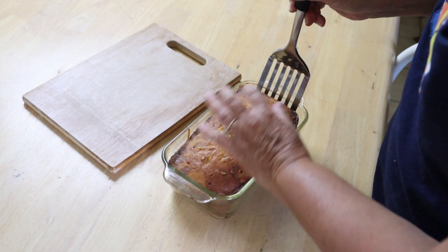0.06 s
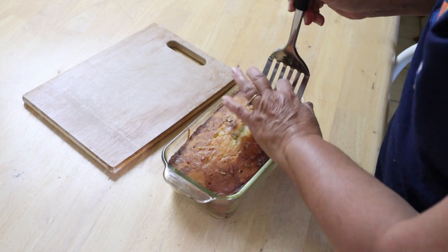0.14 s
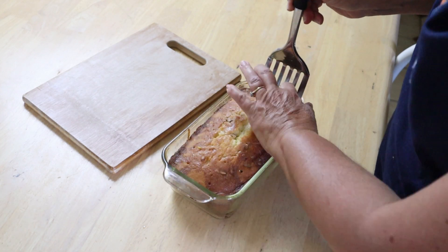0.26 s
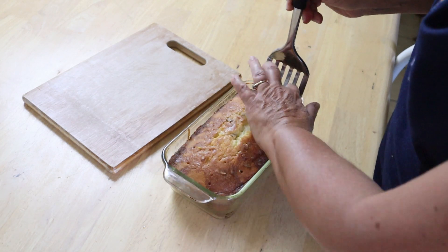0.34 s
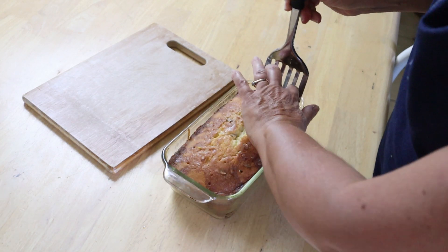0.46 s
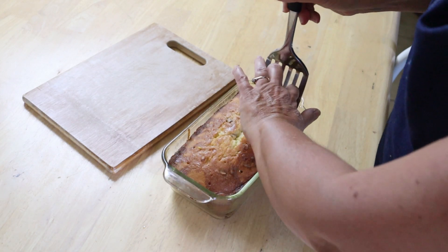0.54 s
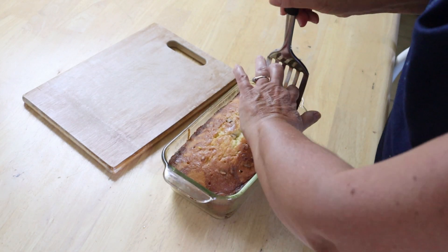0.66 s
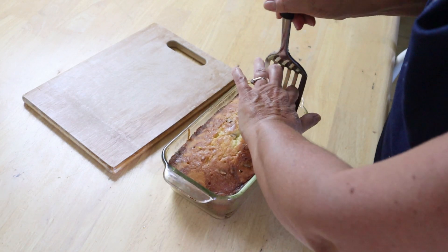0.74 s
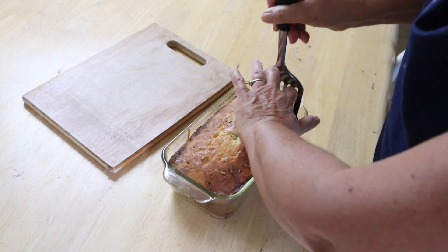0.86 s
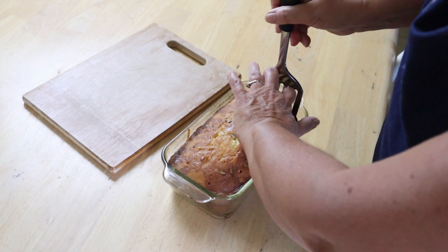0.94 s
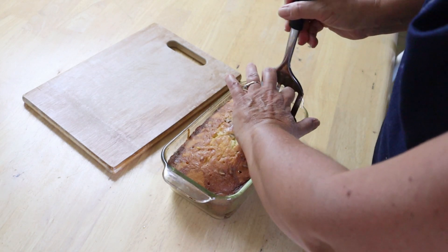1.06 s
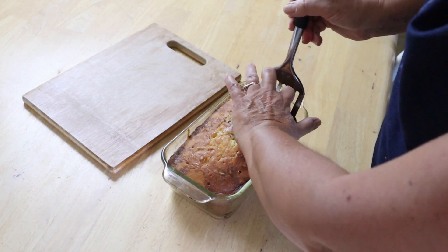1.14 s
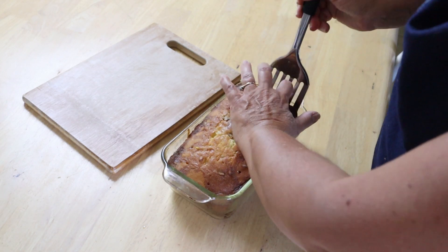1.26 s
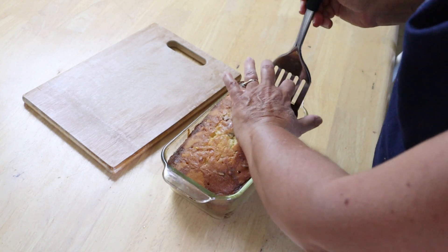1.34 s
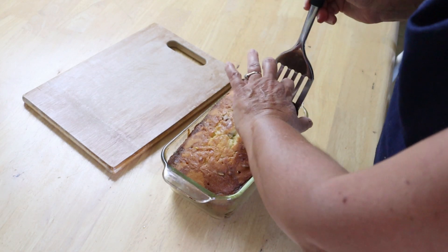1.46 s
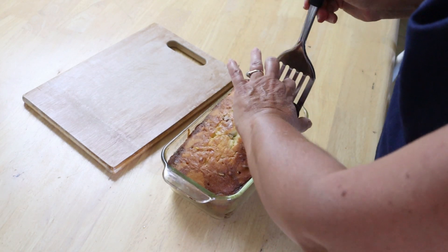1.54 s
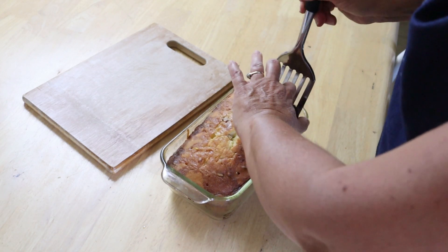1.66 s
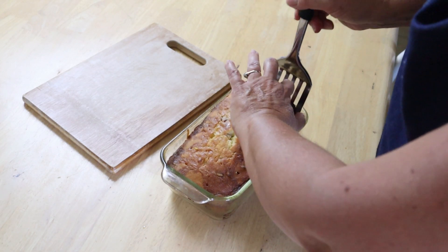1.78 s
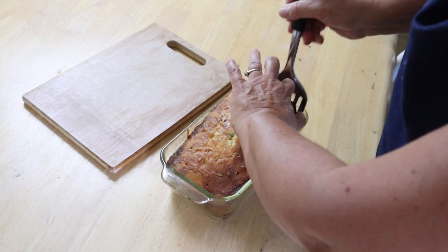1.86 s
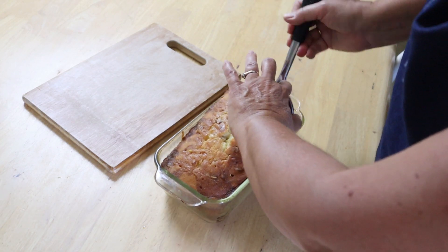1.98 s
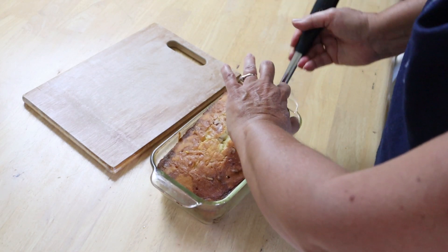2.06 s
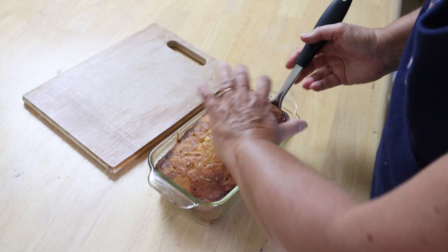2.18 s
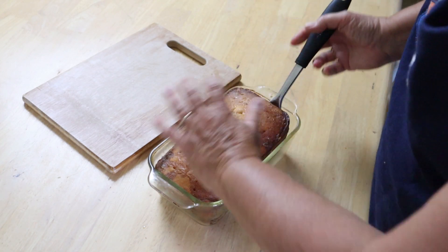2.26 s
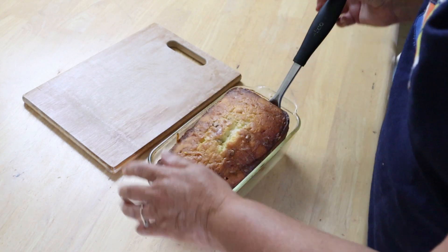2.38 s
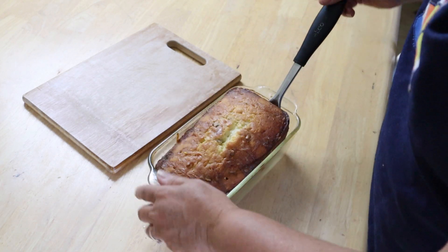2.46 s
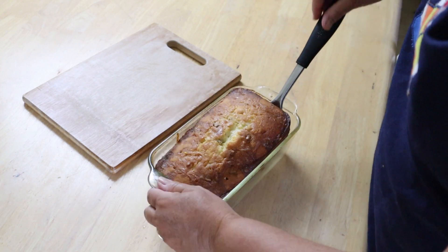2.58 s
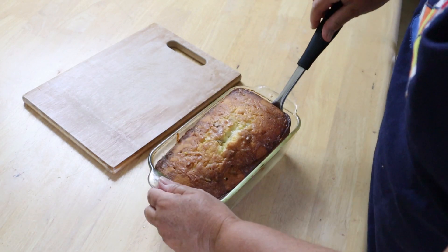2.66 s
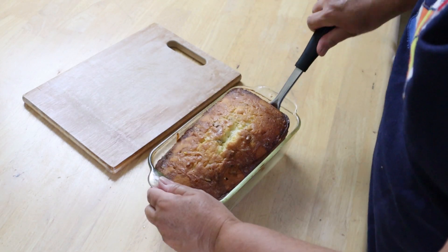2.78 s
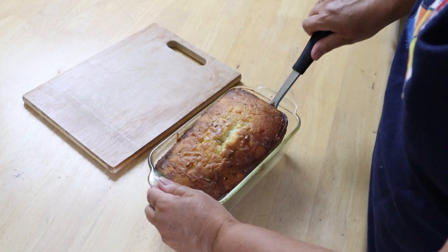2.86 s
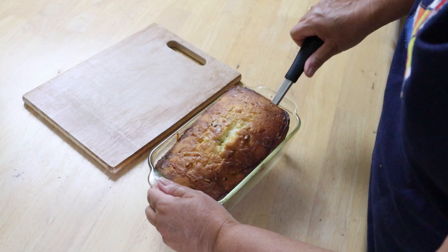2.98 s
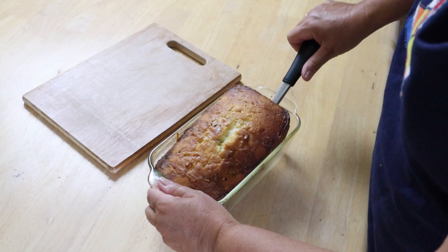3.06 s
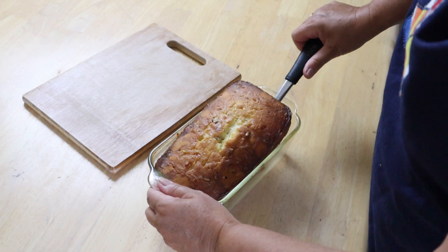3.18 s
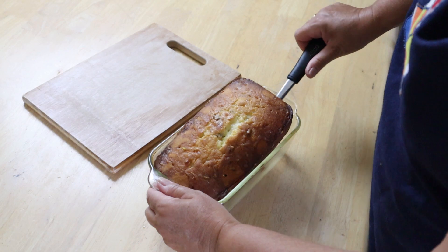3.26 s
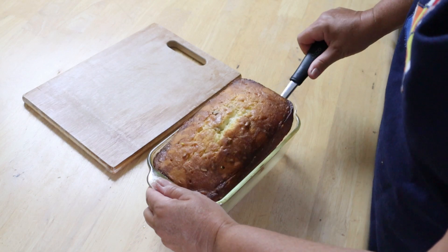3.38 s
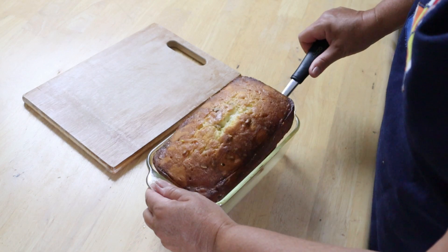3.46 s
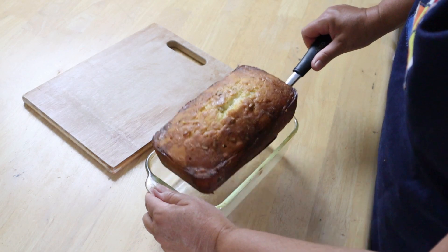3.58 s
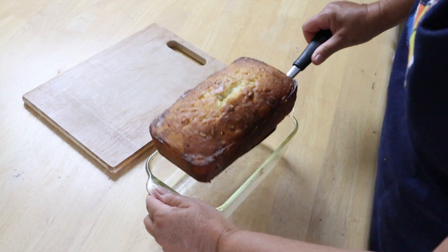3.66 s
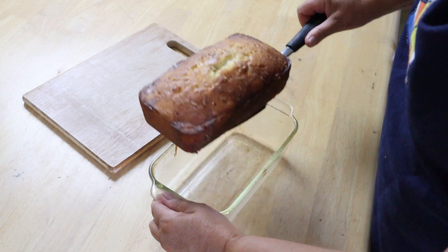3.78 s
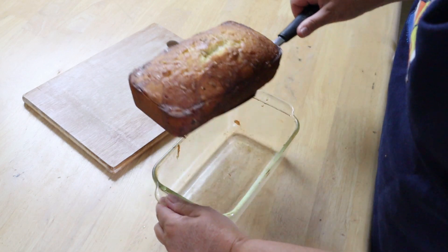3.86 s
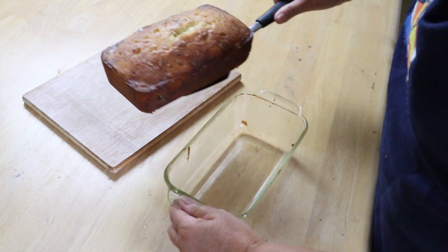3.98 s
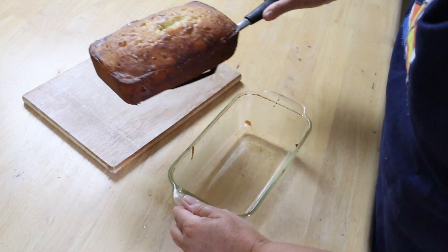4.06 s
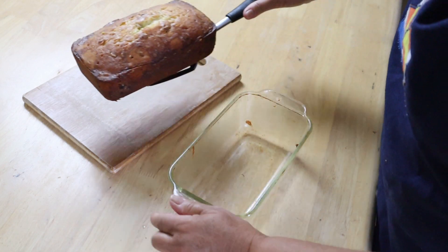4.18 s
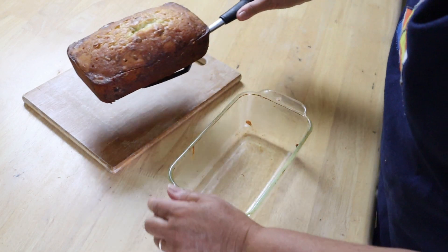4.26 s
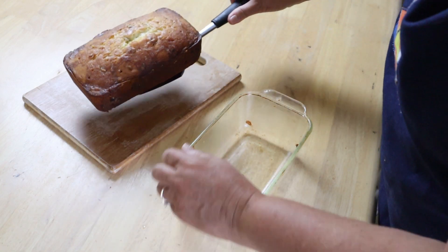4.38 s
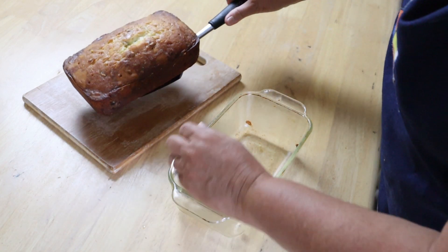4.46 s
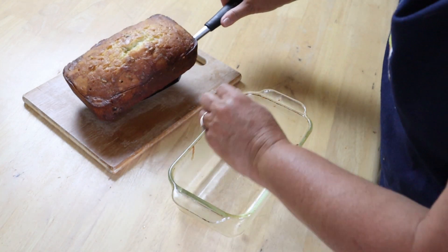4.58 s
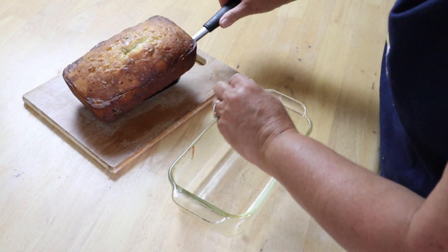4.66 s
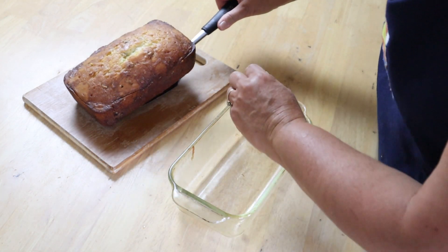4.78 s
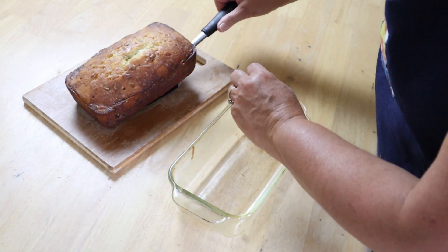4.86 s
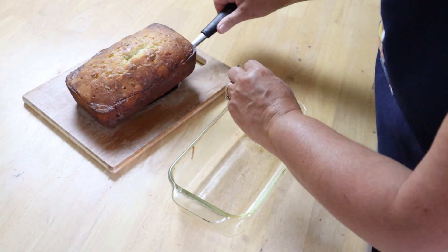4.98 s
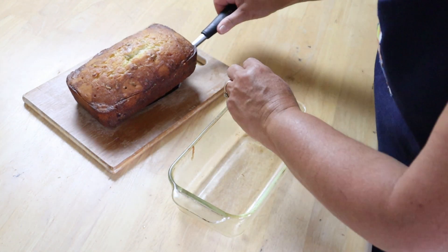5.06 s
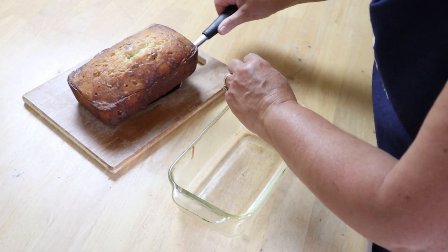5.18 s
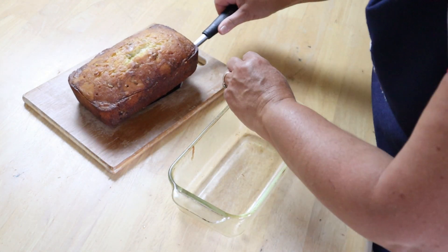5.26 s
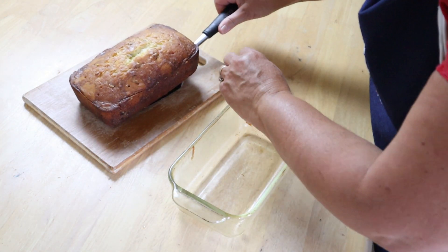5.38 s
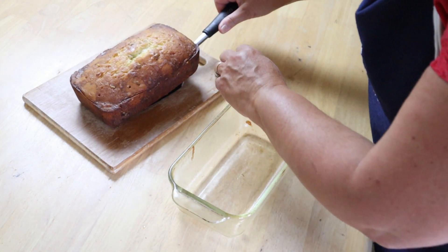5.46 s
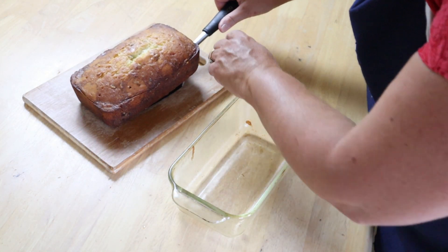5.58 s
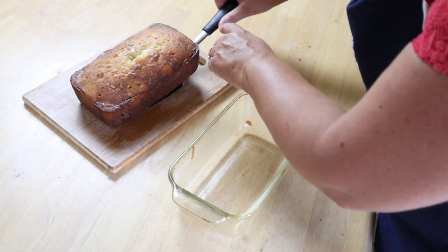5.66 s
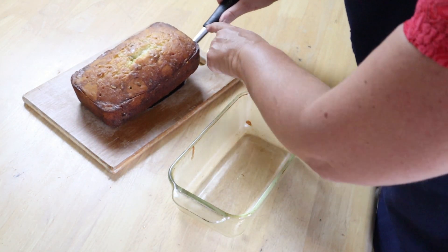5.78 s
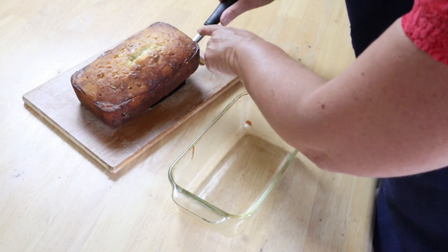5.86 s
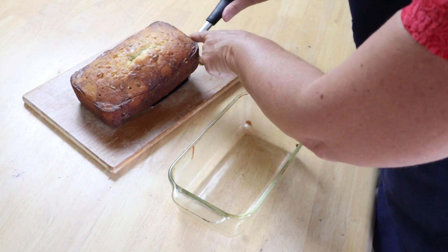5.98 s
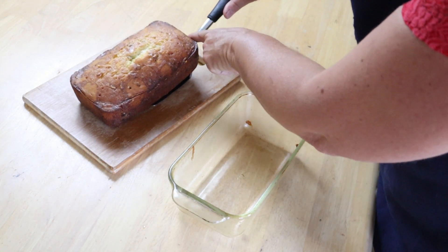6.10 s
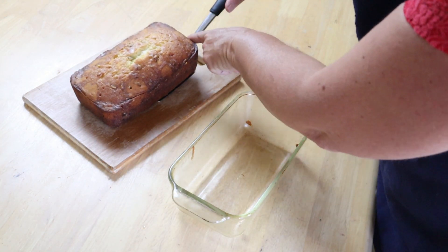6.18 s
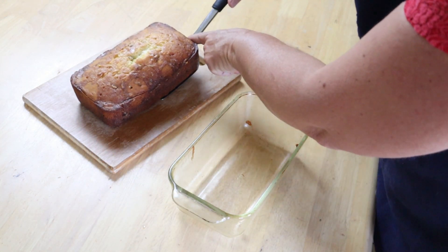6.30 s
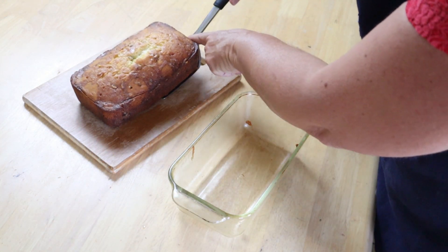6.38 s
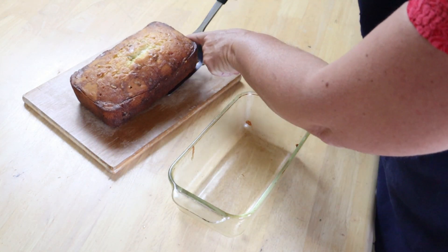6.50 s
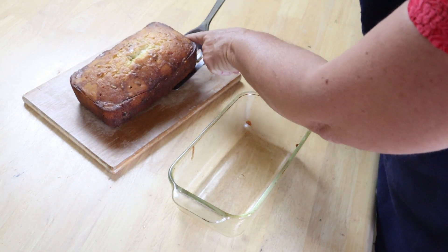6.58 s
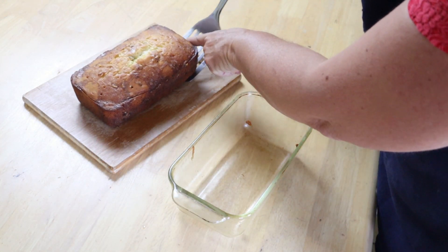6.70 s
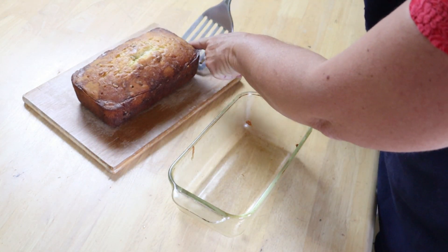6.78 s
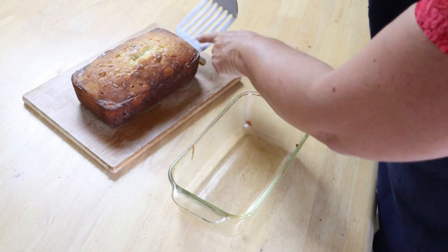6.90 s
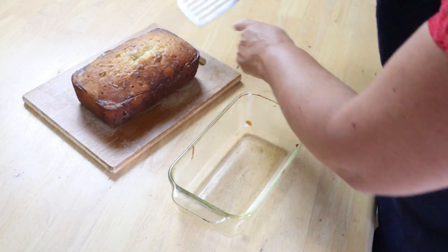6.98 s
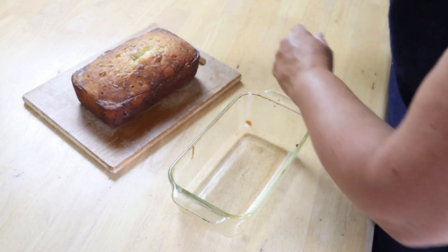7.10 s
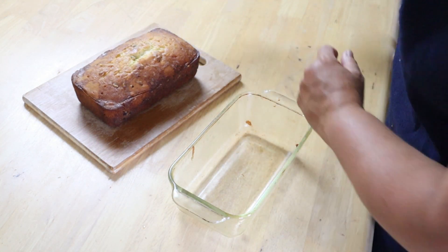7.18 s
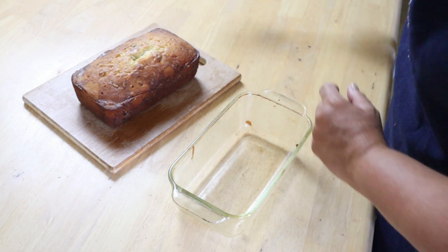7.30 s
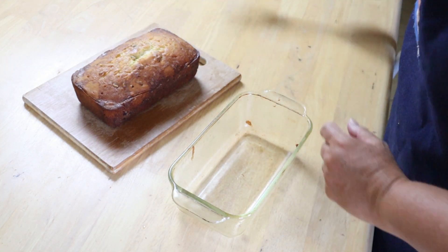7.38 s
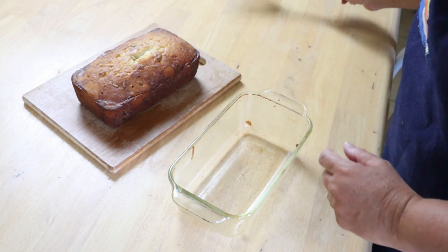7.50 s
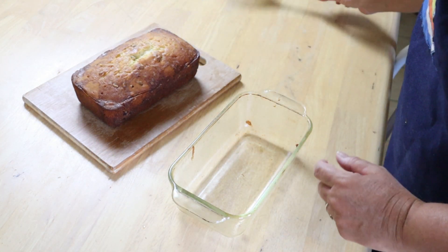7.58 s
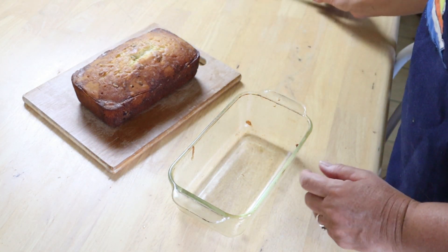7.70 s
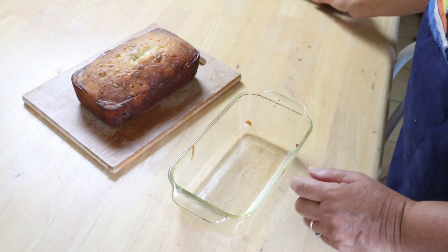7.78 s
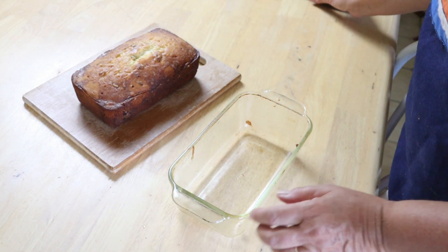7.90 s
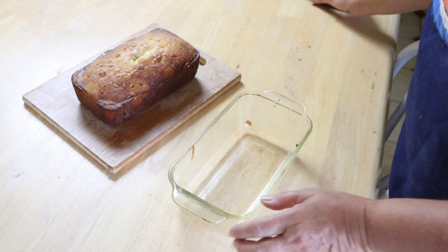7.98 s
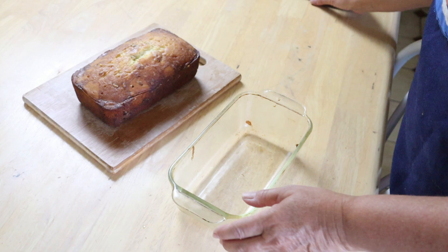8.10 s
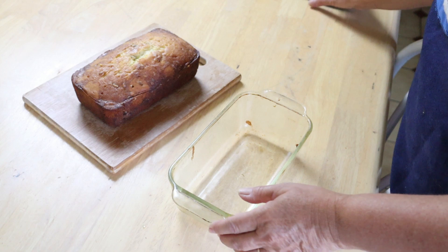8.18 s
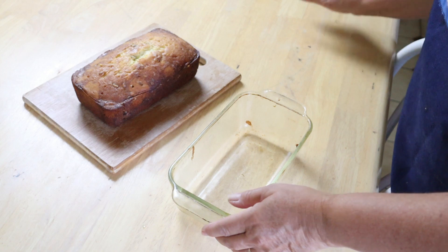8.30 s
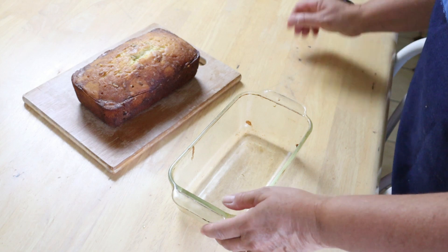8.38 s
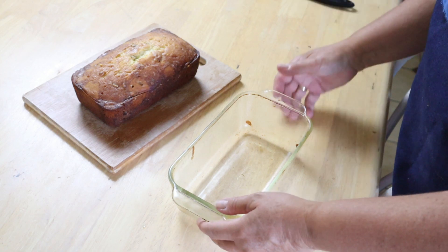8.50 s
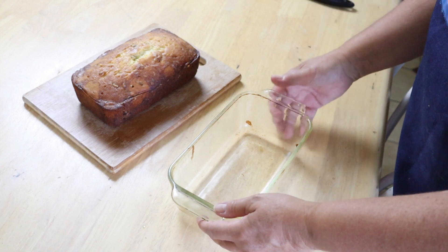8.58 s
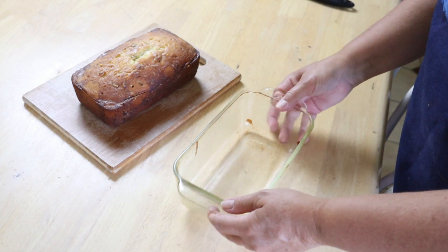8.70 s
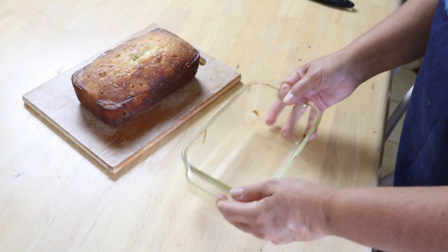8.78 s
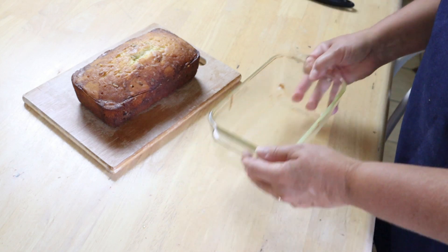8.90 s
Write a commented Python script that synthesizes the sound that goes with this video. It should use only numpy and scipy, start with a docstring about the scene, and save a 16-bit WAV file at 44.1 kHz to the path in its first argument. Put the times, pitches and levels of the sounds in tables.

```python
"""A steel spatula is worked under a loaf in a glass dish: the blade scrapes and clinks, and the dish rocks
and knocks on a wooden table. The loaf is lifted, set down on a board with a thud, and the blade drawn out.
Then the empty dish is bumped on the table and picked up. A clock ticks faintly across the small kitchen.
Hits are fading tones (modes) and short noise bursts; rubbing is a stream of tiny slips that excites modes
or is filtered to a spectrum. All of it gets the kitchen's reverberation, over a quiet background hush."""
import sys
import numpy as np
from scipy import signal
from scipy.fft import rfft, irfft
from scipy.io import wavfile
from scipy.ndimage import map_coordinates

SR = 44100
rng = np.random.default_rng(int(sys.argv[2]) if len(sys.argv) > 2 else 0)


def master_out(mix):
    """Clip the mix to full scale and print it as 16-bit PCM to the path in sys.argv[1]."""
    frames = np.transpose(np.atleast_2d(mix))
    ceiling = np.clip(frames, -1, 1)
    pcm = np.round(ceiling * 32767).astype(np.int16)
    wavfile.write(sys.argv[1], SR, pcm)


N = 394254
TIME = np.arange(N) / SR
AGE = TIME[:SR]  # seconds since a hit; each hit lasts one second
STROKE_RANGE_DB = 20  # level change over a rubbing stroke's rise time, and over its fall time

# Ringing tones of the table top. Each row: pitch in Hz, level in dB, time to fade by 60 dB in seconds.
TABLE_MODES = [(133.3, -30.5, 0.28), (235, -38.5, 0.03), (312, -12, 0.093), (415, -23, 0.039),
               (486, -26, 0.19), (569.5, -12, 0.067), (692, -20, 0.059)]
# Ringing tones of the steel blade. Each row: pitch in Hz, level in dB, basic time to fade by 60 dB in
# seconds (a clink stretches or shortens it and lifts some levels).
BLADE_MODES = [(956, -5.5, 0.06), (1449.5, 2, 0.16), (1798, -3, 0.035), (1872, 3.5, 0.094),
               (2344, 5, 0.094), (2875, -9.5, 0.16), (3355, 2, 0.08), (3730, -11.5, 0.17), (4240, 3, 0.082),
               (4690, -9, 0.11), (4910, -5, 0.068), (5170, -9.5, 0.28), (5340, -8, 0.31), (5440, -11, 0.22),
               (5970, -10, 0.19), (6470, -8, 0.16), (6640, -6, 0.16), (6965, -9.5, 0.14), (7800, -9, 0.21),
               (7900, -7.5, 0.15), (8900, -13, 0.18), (9500, -16, 0.23), (10190, -17, 0.2),
               (11400, -18, 0.32), (13360, -13.5, 0.13)]
# Noise colour of steel on glass. Each row: frequency in Hz, relative level in dB.
STEEL_SPECTRUM = [(300, -16), (900, -3), (1600, 5), (2800, -2), (4300, 0), (8000, 0.5), (11000, -11.5),
                  (15500, -12.5)]
# Noise colour of the groaning table and dish. Each row: frequency in Hz, relative level in dB.
GROAN_SPECTRUM = [(25, -42), (70, -23), (125, 2.5), (200, -20.5), (380, 5), (550, -9), (750, -3.5),
                  (1000, -8), (1600, -28), (4000, -50)]
# Noise colour of rubbing crust. Each row: frequency in Hz, relative level in dB.
CRUST_SPECTRUM = [(40, -43), (120, -5.5), (220, -7.5), (400, 3.5), (700, -6), (1300, -10.5), (2600, -23.5),
                  (8000, -33.5), (15000, -42)]


def from_db(db):
    """Turn decibels into a gain."""
    return 10 ** (np.asarray(db) / 20)


def rms_one(x):
    """Scale a sound to an average (rms) strength of 1."""
    return x / np.sqrt(np.mean(x ** 2) + 1e-20)


def at_hz(points, hz):
    """Read a curve between its points, on a logarithmic frequency axis."""
    f, value = np.transpose(points)
    return np.interp(np.log(hz + 1e-9), np.log(f), value)


def colour(x, spectrum):
    """Filter a sound by a spectrum and scale it to rms 1."""
    gain = from_db(at_hz(spectrum, np.fft.rfftfreq(len(x), 1 / SR)))
    return rms_one(irfft(rfft(x) * gain, len(x)))


def cut(x, hz, kind="low", order=2):
    """Keep what lies below hz ("low") or above it ("high"), with a Butterworth filter."""
    sos = signal.butter(order, min(hz, .45 * SR), kind, fs=SR, output="sos")
    return signal.sosfilt(sos, x + 1e-18)


def radiate(x, hz):
    """A small body sends out little sound below hz."""
    return cut(x, hz, "high", order=4)


def through(x, response):
    """Let x excite a body or a room, given its response to one click."""
    return signal.oaconvolve(x, response)[:len(x)]


def add(out, s, sound):
    """Mix a sound in at time s, in seconds."""
    at = max(0, round(s * SR))
    out[at:at + len(sound)] += sound[:N - at]


def dying(t60):
    """Steady fade that loses 60 dB in t60 seconds."""
    return from_db(-60 * AGE / max(t60, 1e-4))


def ring(modes, scatter_db=0):
    """A struck body: fading sine tones, whose strengths may vary with where the blow lands."""
    total = 0
    for k, (hz, db, t60) in enumerate(modes):
        strength = from_db(db + scatter_db * rng.standard_normal())
        sign = (-1) ** (k * (hz > 1000))  # above 1 kHz, every other tone starts upside down
        total = total + sign * strength * dying(t60) * np.sin(2 * np.pi * hz * AGE)
    return total


def crack(spectrum, t60):
    """Fading noise, like a crowd of overlapping, quickly damped modes."""
    return colour(rng.standard_normal(SR), spectrum) * dying(t60)


def friction(per_s, spread_db, uneven_db, uneven_hz):
    """Tiny slips at random times and of unequal size, made stronger and weaker by a wavering pressure."""
    happens = rng.random(N) < per_s / SR
    slips = happens * rng.standard_normal(N) * from_db(spread_db * np.minimum(rng.exponential(1, N), 4))
    pressure = rms_one(cut(rng.standard_normal(N), uneven_hz))
    return rms_one(slips * from_db(uneven_db * np.clip(pressure, -2, 2)))


def brighten(x, lift_db):
    """A sharper edge contact raises the treble; a negative lift dulls it."""
    # the second filter runs backwards to undo much of the first one's delay
    dull = cut(x, 3000, order=3)[::-1]
    dull = cut(dull, 4500, order=3)[::-1]
    return dull + from_db(lift_db) * (x - dull)


def waver(depth, hz):
    """A factor around 1 that wanders at random, no faster than about hz."""
    return 1 + depth * rms_one(cut(rng.standard_normal(N), hz))


def bend(x, pitch):
    """Raise or lower a lasting ring by a pitch factor that varies in time."""
    return map_coordinates(x, [np.cumsum(pitch)], order=3, mode="wrap")


def stroke(s, rise_s, fall_s):
    """Gain of one rubbing stroke: it swells up to time s, then eases off."""
    away = np.maximum((s - TIME) / max(rise_s, 1e-3), (TIME - s) / max(fall_s, 1e-3))
    return from_db(-STROKE_RANGE_DB * np.minimum(away, 10))


def strokes(rows):
    """Gain of a series of strokes; their powers add."""
    return np.sqrt(sum((from_db(db) * stroke(s, rise_s, fall_s)) ** 2 for s, rise_s, fall_s, db in rows))


def rocking():
    """Each knock is a short, dull bounce of the dish, with the loaf inside or empty, plus the table's ring."""
    # Knocks of the dish. Each row: start in seconds, level in dB, treble cut-off of the contact in Hz,
    # table ring in dB.
    rocks = [(0.000, -14, 1230, 8), (0.017, -17, 1110, 0.5), (0.1223, -12, 696, -7.5), (0.290, -30, 577, 9),
             (0.305, -35.5, 576, 13), (0.5917, -13.5, 653, -5), (0.908, -18, 1000, 12),
             (0.969, 1, 790, -36), (1.6, -7.5, 810, -0.5), (1.950, -5, 940, -28), (1.965, -10, 710, 1),
             (1.999, -15.5, 1200, 8), (2.133, -16.5, 700, 6.5), (2.205, -15.5, 698, 3.5),
             (2.241, -21, 600, -3), (2.585, -21.5, 770, 1), (2.647, -27, 686, 8.5), (2.941, -24.5, 900, 6),
             (3.0239, -15, 730, 5), (3.398, -30, 790, 4), (3.459, -22, 615, -1.5), (8.101, -21.5, 600, 2.5),
             (8.618, -40, 478, 15), (8.632, -31.5, 393, 8), (8.688, -30, 586, -8)]
    out = np.zeros(N)
    bounce = ring([(485.5, 2.5, 0.016), (1100, -0.5, 0.0038)])
    for s, db, contact_hz, table_db in rocks:
        table = ring(TABLE_MODES, scatter_db=0.5) + from_db(-13) * crack(GROAN_SPECTRUM, t60=0.14)
        add(out, s, from_db(db) * cut(bounce + from_db(table_db) * table, contact_hz))
    return radiate(out, 150)


def hushing():
    """A steady, quiet background noise."""
    # Noise colour of the hush. Each row: frequency in Hz, relative level in dB.
    hush_spectrum = [(12, -35), (20, 0), (41, -7), (80, -11.5), (171, -11.5), (315, -13.5), (614, -15.5),
                     (667, -19.5), (857, -17.5), (985, -19.5), (1070, -17), (1160, -19.5), (15500, -29.5)]
    return from_db(-55) * colour(rng.standard_normal(N), hush_spectrum)


def clinking():
    """Steel on glass: a crack and a ring; at the end a finger ring touches the dish."""
    # Clinks. Each row: start in seconds, level in dB, treble lift in dB, pitch in Hz that this contact
    # point rings most.
    clinks = [(0.008, -25, -16, 5450), (0.3, -36, 1, 2320), (0.741, -33.5, -5.5, 1540),
              (0.877, -34.5, 11, 8430), (0.9682, -7, -2.5, 5410), (1.341, -36.5, -0.5, 8500),
              (1.625, -19.5, -7.5, 6880), (1.807, -32, -7, 2270), (1.889, -27, 0, 8450),
              (1.931, -19, 2, 8800), (1.9491, -6, 8, 4165), (1.954, -11, 9, 6940), (1.965, -8.5, 4.5, 8730),
              (1.966, -11, 6.5, 1380), (1.982, -21.5, -35.5, 2930), (2.173, -22, -13, 3330),
              (2.646, -37, 2.5, 5450), (2.955, -35, -6, 4215), (2.989, -30, -13, 2290),
              (3.0915, -19, -2, 4600), (3.135, -31.5, 0, 3350), (3.398, -26.5, -9.5, 1890),
              (7.554, -40.5, 0, 6100)]
    # Tones of the finger ring's touch. Each row: pitch in Hz, level in dB, time to fade by 60 dB in seconds.
    finger_ring_modes = [(3340, -5, 0.065), (5070, -3, 0.11), (5600, -5, 0.24), (7950, -5, 0.18),
                         (8850, -4, 0.064), (9765, -6, 0.12), (11270, -19, 0.18)]
    out = np.zeros(N)
    for s, db, lift_db, ring_hz in clinks:
        tines = []
        # the tines ring at slightly different pitches, new for each clink, and beat: two per blade tone
        for hz, level, t60 in BLADE_MODES + BLADE_MODES:
            near = np.exp(-(np.log(hz / ring_hz) / .06) ** 2)  # 1 at the favoured pitch, 0 far away
            detune = 1 + .012 * rng.standard_normal()
            tines.append((hz * detune, level + 4 * near, t60 * (.6 + near)))
        body = from_db(-6) * crack(STEEL_SPECTRUM, t60=0.037) + from_db(-23) * ring(tines)
        add(out, s, from_db(db) * brighten(body, lift_db))
    add(out, 8.688, from_db(-43) * ring(finger_ring_modes))
    return radiate(out, 250)


def thudding():
    """Soft weight shakes the board and makes the table boom; the blade also taps down on the board."""
    # Thuds. Each row: start in seconds, board level in dB (before a common 5.5 dB cut), table boom in dB.
    thuds = [(0.017, -56, -30), (0.974, -39, -38.5), (2.0, -35, -42), (2.16, -37, -37), (3.019, -45, -30),
             (4.088, -62, -38), (4.913, -53.5, -58), (5.093, -50, -56), (5.386, -41.5, -52),
             (5.411, -39, -50), (5.440, -27, -56), (5.463, -28.5, -50), (8.042, -52, -40),
             (8.62, -63, -34.5)]
    # The board, the table's lowest tones and the blade's tap, as three tables of ringing tones.
    # Each row: pitch in Hz, level in dB, time to fade by 60 dB in seconds.
    board_modes = [(44.3, 2.5, 0.42), (68, -20, .15), (104.4, -16.5, 0.27), (168.5, -15, 0.21),
                   (235.6, 5.5, 0.14), (305, -1.5, 0.087), (391, 5, 0.053), (471, 5.5, 0.032),
                   (723, -7, 0.11)]
    boom_modes = [(86, -16, 0.17), (113.7, 0, 0.18), (132, -4, 0.26)]
    tap_modes = [(400, 0.5, 0.014), (955, -4.5, 0.057), (1213, 9, 0.014), (1262, -7.5, 0.18),
                 (2030, -19, 0.022)]
    out = np.zeros(N)
    add(out, 5.121, from_db(-36.5) * ring(tap_modes))
    board = cut(ring(board_modes), 860)
    boom = radiate(cut(ring(boom_modes), 270), hz=70)
    for s, board_db, boom_db in thuds:
        add(out, s, from_db(board_db - 5.5) * board + from_db(boom_db) * boom)
    return radiate(out, 21.4)


def ticking(first_tick_s=.569, swell_s=0.018):
    """The far clock ticks once a second and arrives blurred, as a swelling and fading noise."""
    # How loud each tick arrives, one level in dB per tick.
    ticks_db = [-43, -39.5, -38.5, -43, -38.5, -43.5, -47, -44.5, -38.5]
    # Noise colour of a tick. Each row: frequency in Hz, relative level in dB.
    clock_spectrum = [(200, -17), (600, -4.5), (1100, 3), (1800, 0.5), (3500, -15), (7000, -13),
                      (11000, -21.5), (15000, -29.5)]
    out = np.zeros(N)
    swell = np.minimum(AGE / swell_s, 1) ** 2
    for second, db in enumerate(ticks_db):
        add(out, first_tick_s + second, from_db(db) * crack(clock_spectrum, t60=0.43) * swell)
    return out


def prying():
    """The blade sticks and slips: with each push the dish groans on the table and the flexing steel rasps."""
    # Pushes between loaf and glass. Each row: peak in seconds, rise in seconds, fall in seconds,
    # groan in dB and rasp in dB (both before the common gains below), treble lift of the rasp in dB.
    pries = [(0.89, 0.033, .12, -28, -28.5, -5), (0.995, 0.089, .06, -21, -42.5, -10),
             (1.28, 0.2, 0.35, -34, -56.5, 1.5), (1.969, 0.055, .11, -12.5, -20, -6),
             (2.06, 0.04, 0.17, -36, -34.5, 0), (2.18, 0.065, 0.064, -22.5, -29.5, -14),
             (2.46, 0.42, 0.98, -47.5, -68.5, 5.5), (2.995, 0.14, 0.19, -27.5, -43.5, -8.5),
             (3.105, .03, 0.068, -27, -48, -2), (3.3, 0.082, 0.2, -47, -68, -4)]
    slips = friction(per_s=2500, spread_db=4, uneven_db=1, uneven_hz=71.8)
    grit = friction(per_s=1100, spread_db=2, uneven_db=2, uneven_hz=70)

    table = rms_one(through(slips, ring(TABLE_MODES)))
    groan = rms_one(colour(slips, GROAN_SPECTRUM) + from_db(-4.5) * table)
    groan = from_db(-2) * radiate(groan, hz=200)

    flex = waver(.03, 14)
    blade = rms_one(bend(through(grit, ring(BLADE_MODES)), flex))
    rasp = rms_one(blade + from_db(-1) * colour(grit, STEEL_SPECTRUM))
    rasp = from_db(3.5) * radiate(rasp, hz=300)

    out = np.zeros(N)
    for s, rise_s, fall_s, groan_db, rasp_db, lift_db in pries:
        push = from_db(groan_db) * groan + from_db(rasp_db) * brighten(rasp, lift_db)
        out += stroke(s, rise_s, fall_s) * push
    return out


def creaking(jitter=.055, judder_top_hz=950):
    """Nearly regular stick and slip, mostly slowing: a squeal above, the table's judder below."""
    # Creaks of steel on glass or judders of the dish on the table. Each row: peak in seconds,
    # rise in seconds, fall in seconds, squeal in dB, low judder in dB, average slips per second at the
    # peak, rate of slowing per second.
    creaks = [(0.887, 0.034, 0.064, -25, -31.5, 560, 1.47), (1.94, 0.069, .025, -27.5, -23.5, 433, 1.63),
              (3.0, .09, 0.14, -39, -33.5, 475, .2), (8.127, 0.057, 0.056, -42, -23.5, 384, 0)]
    # Noise colour of the squeal. Each row: frequency in Hz, relative level in dB.
    squeal_spectrum = [(250, -18), (500, -7), (1000, -8), (1300, -9), (1800, 1), (2350, -4), (2900, -16),
                       (5500, -18), (12000, -28)]
    out = np.zeros(N)
    unsteady = waver(jitter, 250)
    sizes = from_db(2.5 * rng.standard_normal(N))
    for s, rise_s, fall_s, squeal_db, judder_db, per_s, slowing in creaks:
        rate = per_s * unsteady * np.exp(-slowing * np.clip(TIME - s, -rise_s, fall_s))
        # one slip each time the running count passes a whole number
        slips = np.diff(np.floor(np.cumsum(rate) / SR), prepend=0) * sizes
        slips = radiate(slips, hz=340.6)
        squeal = colour(slips, squeal_spectrum)
        judder = rms_one(cut(slips, judder_top_hz, order=3))
        out += stroke(s, rise_s, fall_s) * (from_db(squeal_db) * squeal + from_db(judder_db) * judder)
    return out


def lifting(singing_db=-13, singing_growth_db_per_s=14):
    """Crust rubs up the glass wall, harder as it rises; the blade sings faintly as it takes the weight."""
    start_s, end_s, attack_s, release_s = 3.615, 4.128, 0.24, 0.097
    start_db, growth_db_per_s = -45.5, 17.5
    # Tones of the blade under load. Each row: pitch in Hz, level in dB, time to fade by 60 dB in seconds.
    loaded_blade_modes = [(126, -10, 0.16), (414, 6.5, 0.11), (1336, -2, .16), (2426, -6, .14),
                          (3070, -10, 0.069), (3400, -18.5, 0.16), (4210, -11, 0.18), (5010, -6, 0.055),
                          (5950, -13, .12), (6460, -10, 0.18), (7970, -8.5, .12), (8470, -13.5, .18),
                          (11600, -22, .15)]
    slips = friction(per_s=6000, spread_db=0.5, uneven_db=0, uneven_hz=60)
    singing = rms_one(bend(through(slips, ring(loaded_blade_modes)), waver(.008, 12)))
    risen_s = np.clip(TIME, start_s, end_s) - start_s
    singing_gain = from_db(singing_db + singing_growth_db_per_s * risen_s)
    rub = colour(slips, CRUST_SPECTRUM) + singing_gain * singing
    # the level falls away before the start and after the loaf comes free
    away = np.maximum((start_s - TIME) / attack_s, (TIME - end_s) / release_s)
    level_db = start_db + growth_db_per_s * risen_s - STROKE_RANGE_DB * np.clip(away, 0, 10)
    return from_db(level_db) * rub


def brushing():
    """Hands and clothing brush about: soft friction of skin and cloth."""
    # Brushes. Each row: peak in seconds, rise in seconds, fall in seconds, level in dB.
    brushes = [(4.87, 0.31, 0.24, -61.5), (5.65, 1.0, 0.5, -53.5), (7.26, 0.56, 0.31, -63.5),
               (7.95, 0.72, .9, -55), (8.72, 0.38, 0.2, -44.5)]
    # Noise colour of skin and cloth. Each row: frequency in Hz, relative level in dB.
    cloth_spectrum = [(60, 3.5), (150, 0.5), (450, 10), (1200, -4), (3000, -18), (8000, -19.5),
                      (15000, -27.5)]
    slips = friction(per_s=9000, spread_db=2, uneven_db=2.5, uneven_hz=60)
    return strokes(brushes) * colour(slips, cloth_spectrum)


def withdrawing(rise_per_s=.25):
    """Crust drags over the slotted blade, whose ring rises as the load comes off."""
    # Pulls on the blade. Each row: peak in seconds, rise in seconds, fall in seconds, level in dB.
    pulls = [(6.29, 0.067, 0.075, -51.5), (6.62, 0.099, 0.099, -56.5), (6.825, 0.26, 0.032, -41.5)]
    # Tones of the freed blade. Each row: pitch in Hz, level in dB, time to fade by 60 dB in seconds.
    free_blade_modes = [(983, 5.5, 0.051), (1407, 1, 0.06), (2050, 4, 0.028), (2450, -11, 0.25),
                        (3030, -8, .07), (3800, -16, 0.2), (4210, -21.5, .2), (4980, -18, .13),
                        (6100, -11.5, 0.14), (7730, -3, 0.043), (8400, -14, 0.11), (9520, -15, .16),
                        (10900, -17, .16), (11900, -11.5, .05)]
    slips = friction(per_s=6700, spread_db=4, uneven_db=-2, uneven_hz=40)
    # the pitch climbs from 0.12 s before to 0.12 s after 6.77 s
    pitch = waver(.012, 15) + rise_per_s * np.clip(TIME - 6.77, -.12, .12)
    blade = rms_one(bend(through(slips, ring(free_blade_modes)), pitch))
    steel = from_db(-5) * colour(slips, STEEL_SPECTRUM)
    crust = from_db(-9) * colour(slips, CRUST_SPECTRUM)
    return strokes(pulls) * (blade + steel + crust)


def bumping():
    """Bare glass on wood: a hard slap, the clatter of the table top and the dish's own ring."""
    # Contacts of the empty dish. Each row: start in seconds, level in dB, treble cut-off of the contact
    # in Hz, slap of the flat base in dB, ring of the rim in dB.
    bumps = [(8.0349, -6.5, 3500, -7, -28), (8.0365, -11.5, 2500, 3, -32), (8.043, -11.5, 3000, 5.5, -48),
             (8.103, -12.5, 880, -13, -43), (8.115, -14.5, 870, 7.5, -49), (8.13, -18, 796, 5, -51),
             (8.1886, -3, 1620, 11, -44), (8.208, -10, 1000, -1, -41), (8.2164, -8, 905, 10, -51)]
    # Noise colour of the clattering wood. Each row: frequency in Hz, relative level in dB.
    wood_spectrum = [(60, -39), (130, -72), (300, -8.5), (800, 6.5), (1500, 11), (2400, 6.5), (3200, -9.5),
                     (5500, -17), (8000, -8.5), (14000, -47)]
    # The empty dish, and its lasting hum, as two tables of ringing tones.
    # Each row: pitch in Hz, level in dB, time to fade by 60 dB in seconds.
    empty_dish_modes = [(380.5, -18.5, 0.096), (415, -33, 0.18), (773, -19, 0.079), (842, -21, 0.27),
                        (979, -28, 0.13), (1140, -26, 0.081), (1520, -22.5, 0.047), (1584, -32, 0.06),
                        (2270, -50, .14), (2610, -25, 0.066)]
    hum_modes = [(985, -39, 1.2)]
    out = np.zeros(N)
    slap = -ring([(863, 0.0085, 0.0055)])
    rim = ring([(4226, -8.5, 0.2), (4330, -9, 0.32), (4420, -16, 0.18)])
    for s, db, contact_hz, slap_db, rim_db in bumps:
        clatter = from_db(-3) * crack(wood_spectrum, t60=0.033)
        body = from_db(slap_db) * slap + clatter + from_db(3.5) * ring(empty_dish_modes)
        add(out, s, from_db(db) * (cut(body, contact_hz, order=1) + from_db(rim_db) * rim))
    # from its last bounce the dish is free to hum on
    add(out, bumps[-1][0], ring(hum_modes))
    return radiate(out, 118)


def kitchen(x, first_s=0.0031, build_s=0.0064):
    """Reflections build up within milliseconds, then die away, each pitch range at its own speed."""
    # The room's echo times. Each row: frequency in Hz, time to fade by 60 dB in seconds.
    echo_times = [(100, 0.64), (500, 0.35), (2000, 0.46), (6000, 0.42), (14000, 0.18)]
    white = rfft(rng.standard_normal(SR))
    hz = np.fft.rfftfreq(SR, 1 / SR)
    edges = np.r_[0, np.geomspace(125, SR / 2, 8)]
    tail = np.zeros(SR)
    for low, high in zip(edges, edges[1:]):
        band = irfft(white * (hz >= low) * (hz < high), SR)
        tail += band * dying(at_hz(echo_times, (low + high) / 2))
    tail = tail * np.clip((AGE - first_s) / build_s, 0, 1)
    return through(x, tail / np.sqrt(np.sum(tail ** 2)))


def scene():
    """All sources share the room, each group with its own amount of reverberation; the hush stays dry."""
    knocks = rocking() + thudding() + creaking()
    bumps = bumping()
    steel = clinking() + prying() + lifting() + withdrawing() + brushing() + ticking()
    room = kitchen(from_db(-9) * knocks + from_db(-5) * bumps + from_db(-9.5) * steel)
    return (knocks + bumps + steel + room + hushing())[None]


def record(dry):
    """The hardest hits overload and are clipped; the top above 15.8 kHz is cut."""
    top_cut = signal.ellip(10, .1, 70, 15800, fs=SR, output="sos")
    return signal.sosfilt(top_cut, np.clip(dry, -1, 1))


dry = scene()
out = record(dry)
master_out(out)
```